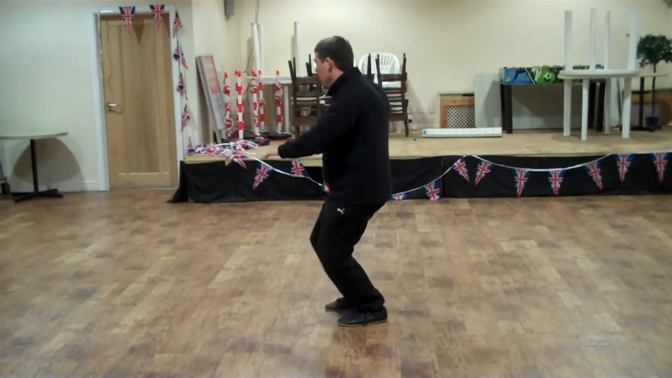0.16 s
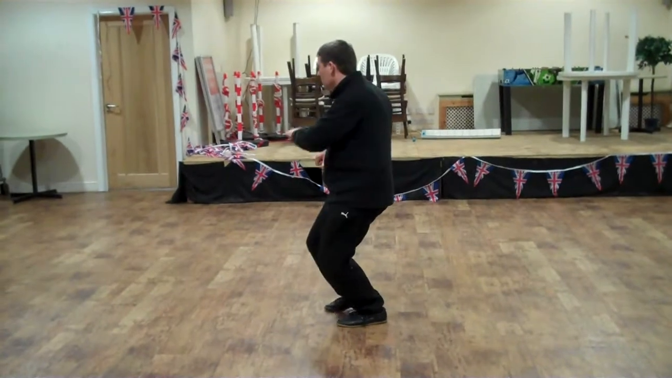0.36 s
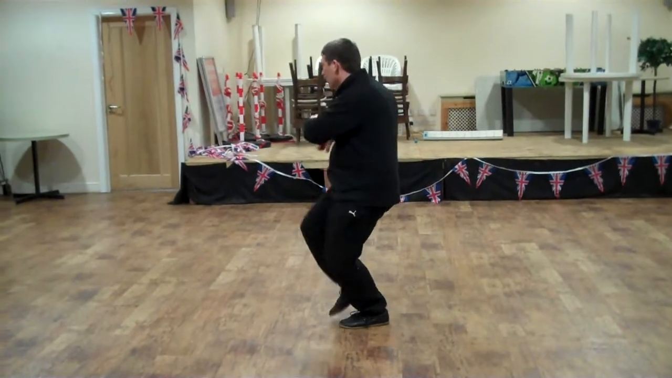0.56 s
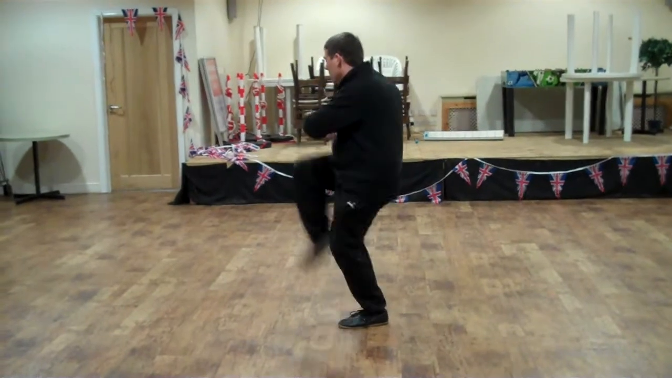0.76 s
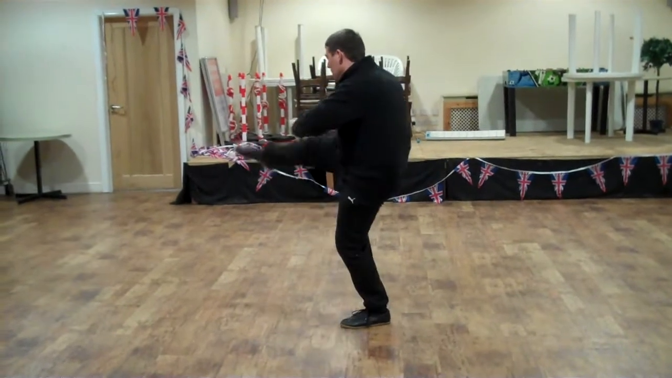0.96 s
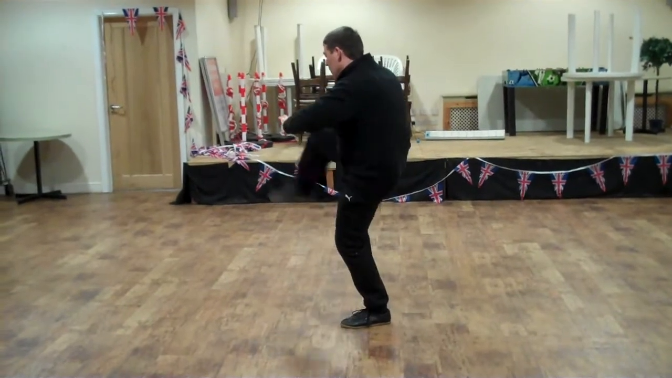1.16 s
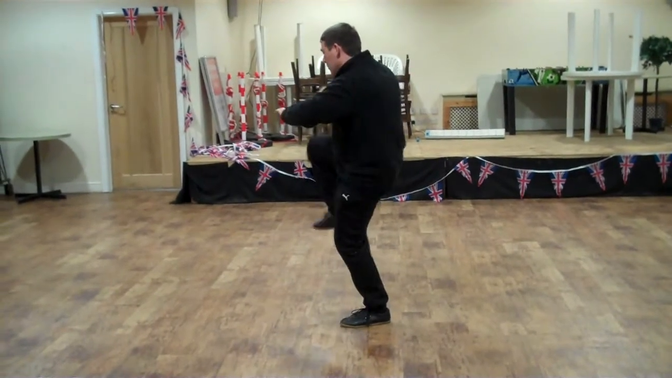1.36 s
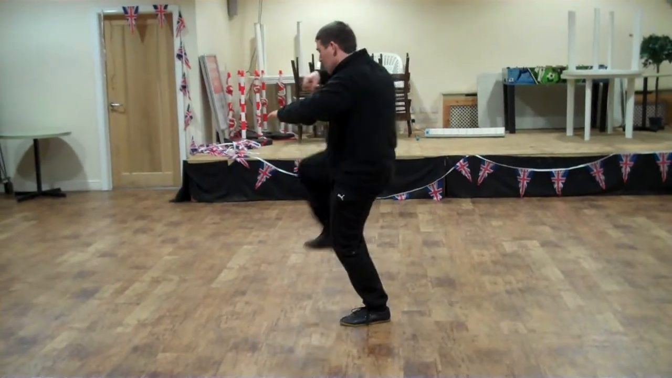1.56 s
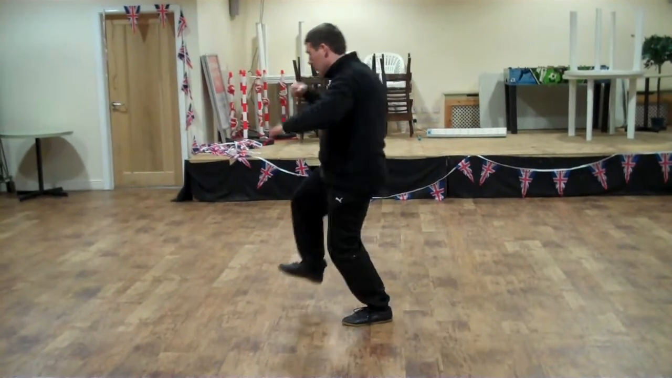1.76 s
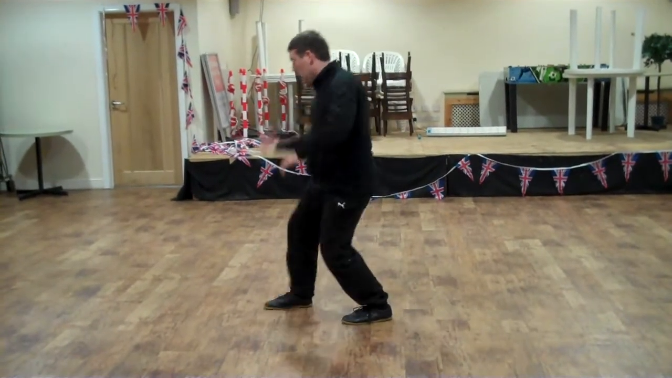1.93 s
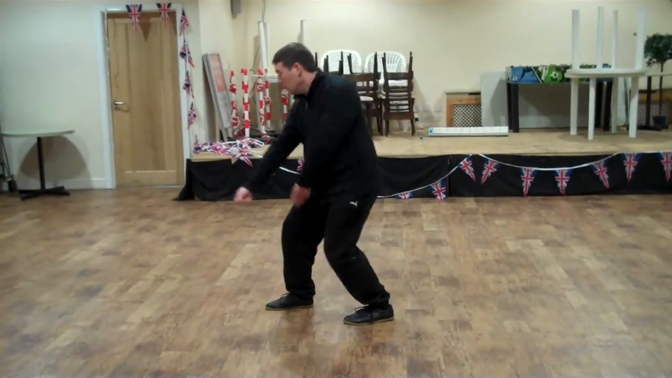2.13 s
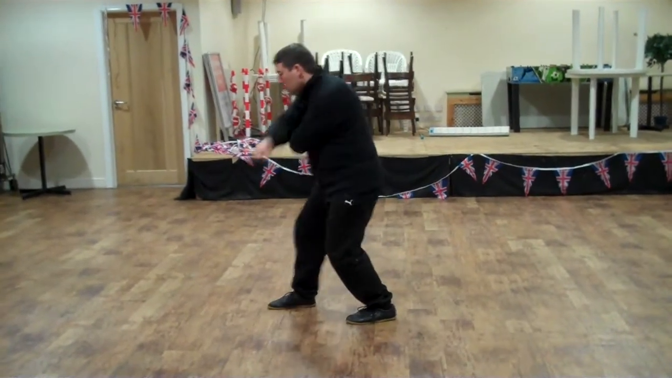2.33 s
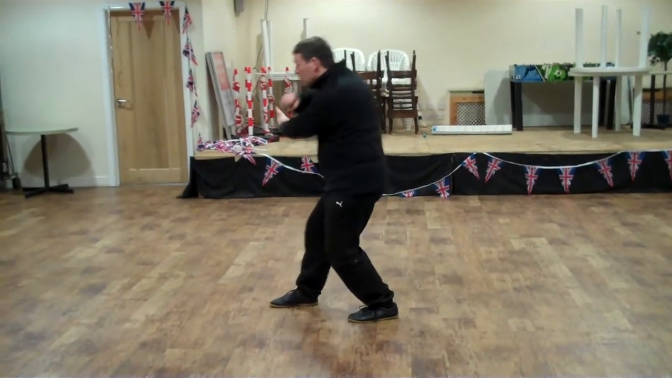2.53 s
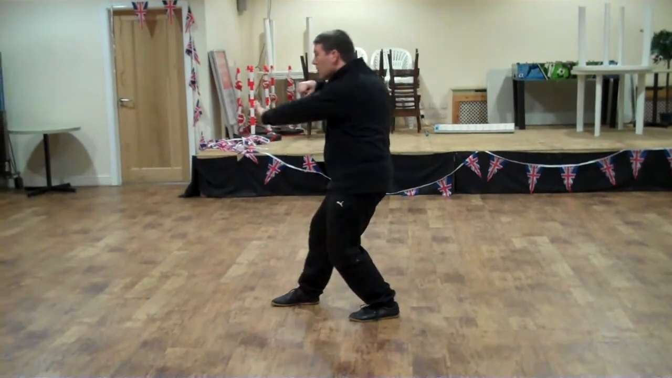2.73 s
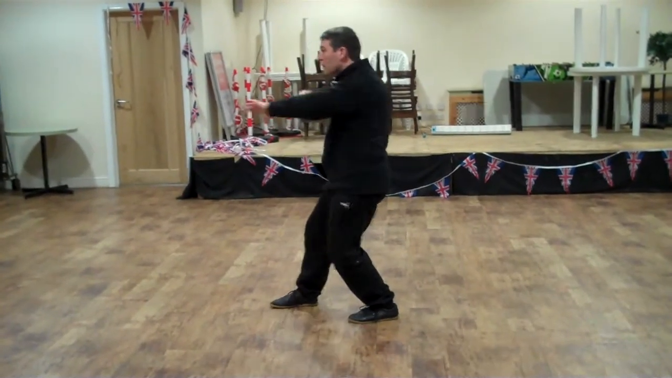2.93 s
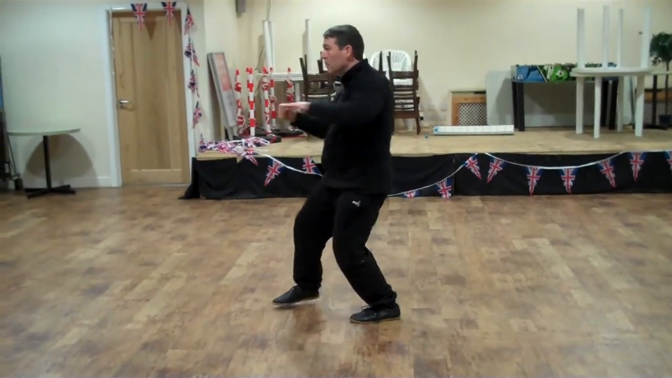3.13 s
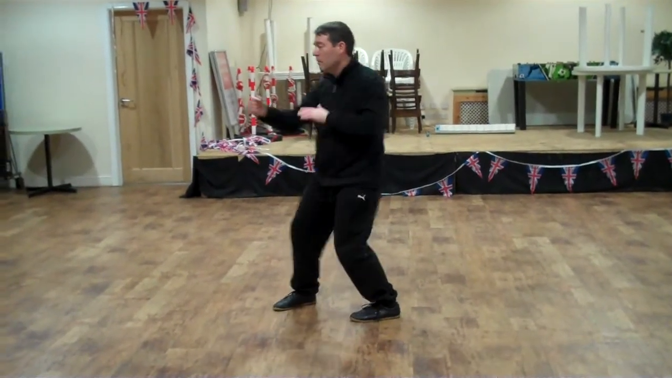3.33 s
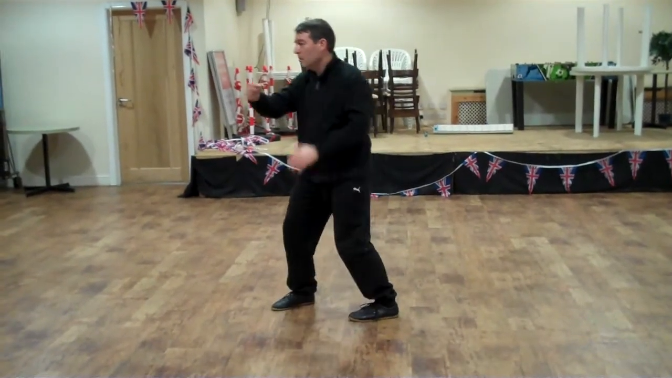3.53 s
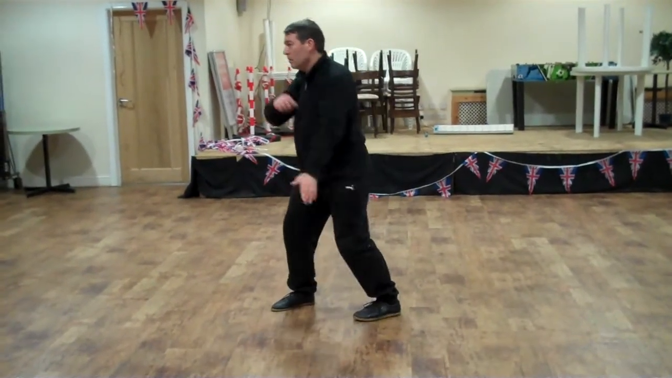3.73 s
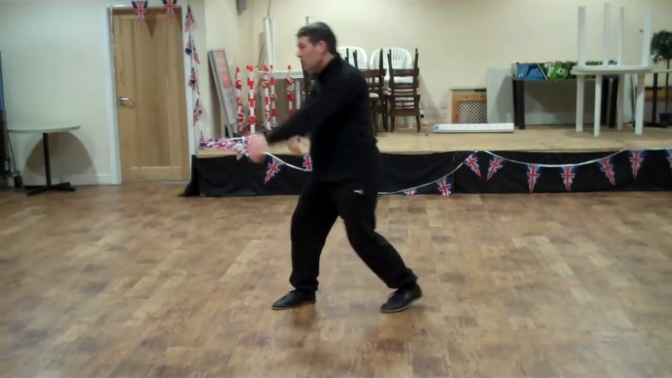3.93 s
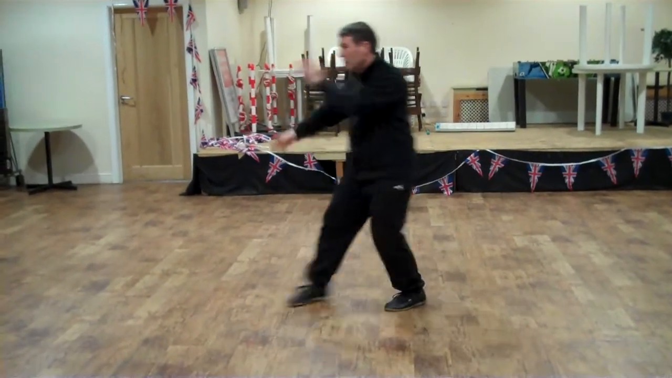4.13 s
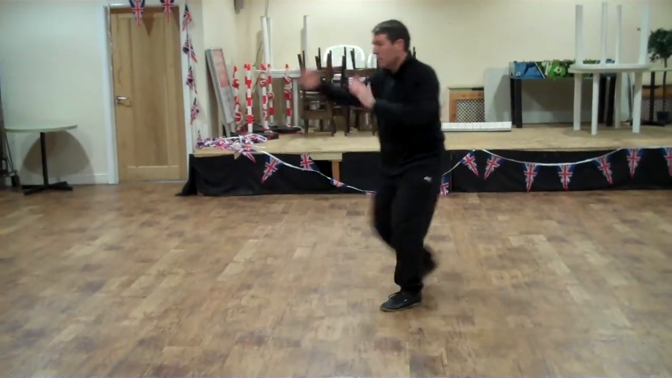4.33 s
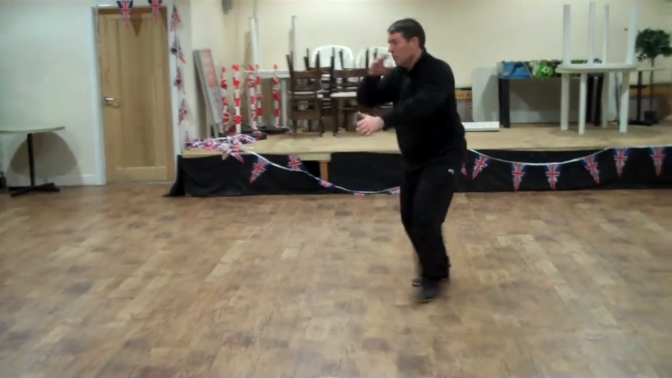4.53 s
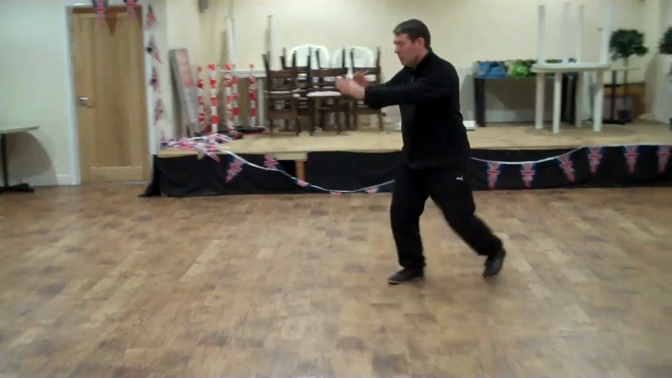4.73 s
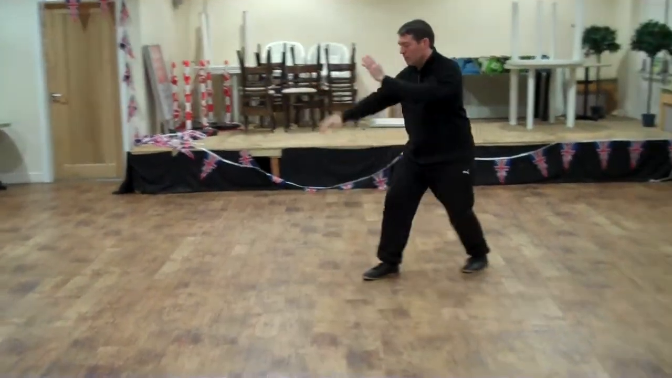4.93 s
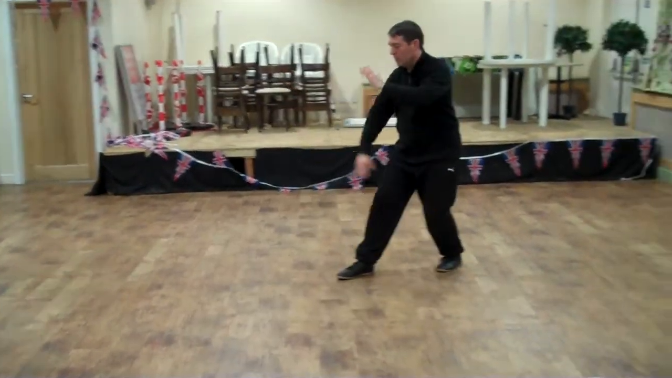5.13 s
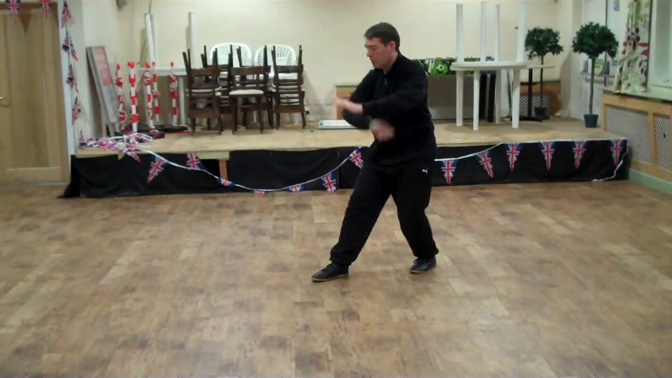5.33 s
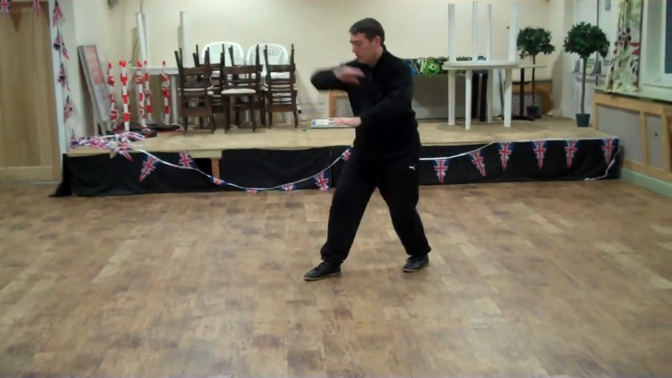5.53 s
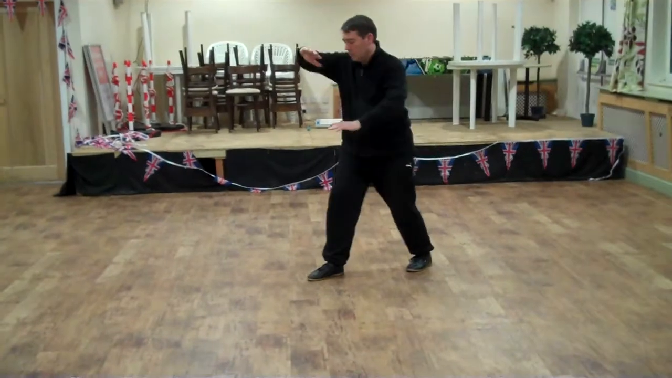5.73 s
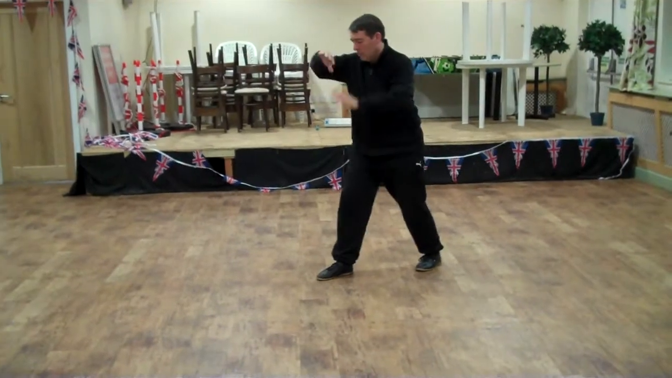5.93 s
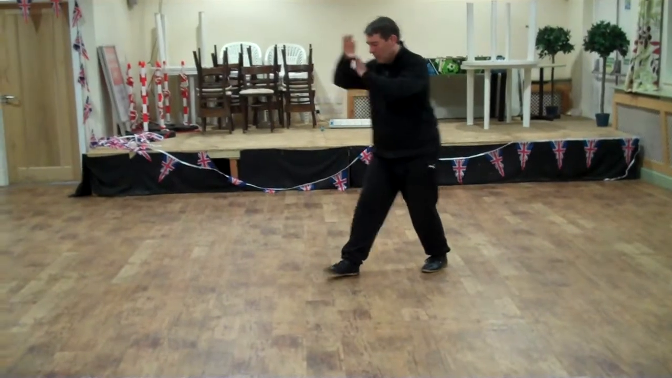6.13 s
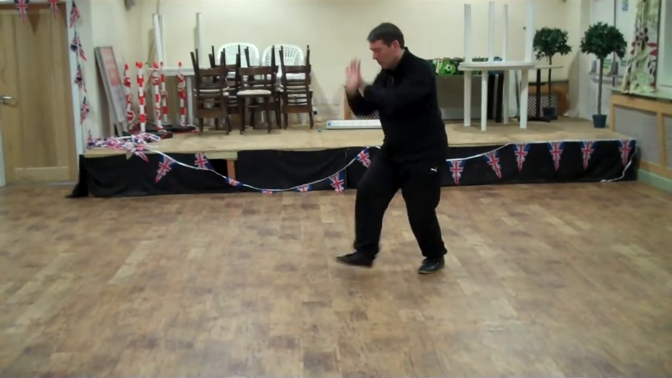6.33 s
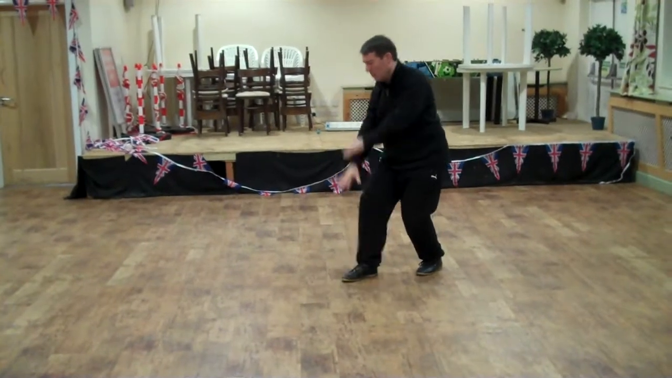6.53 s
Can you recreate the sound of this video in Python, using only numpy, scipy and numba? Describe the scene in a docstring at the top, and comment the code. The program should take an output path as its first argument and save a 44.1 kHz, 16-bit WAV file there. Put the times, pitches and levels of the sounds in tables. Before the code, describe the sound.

Quiet ventilation and faint hum fill a large, empty wooden-floored hall. Two tiny shoe taps precede a loud, sharp stamp that rings away in the reverberation. A crisp hand slap on the arm follows, then clothing swishes, a dull footfall and two hollow shoe slides. After a calm stretch, a flat sole smacks the floor. Stereo microphones hear it from some distance.

```python
"""A man practises martial-arts moves on the wooden floor of a large empty hall, over quiet air noise and hum tones.
Filtered noise swishes as his clothes swing, and shoes touch lightly; a stamp follows, then a slap on the arm.
Weight rumbles through the floor, a thud lands, his shoes slide twice as gliding resonances, and a faint whine sets in.
Last, a foot slaps down flat. Blows are click-and-noise runs that ring a struck body, with two near echoes;
blows, touches, cloth and slides ring on in the hall, a dying stereo noise."""
import sys
import numpy as np
from scipy import signal
from scipy.fft import rfft, irfft, next_fast_len
from scipy.io import wavfile
from numba import njit

SR = 44100
rng = np.random.default_rng(int(sys.argv[2]) if len(sys.argv) > 2 else 0)


def generate_wav(sig):
    """Save sig (samples, or channels by samples) to the path in sys.argv[1] as 16-bit PCM at SR."""
    pcm = np.round(np.clip(np.atleast_2d(sig).T, -1, 1) * 32767).astype(np.int16)
    wavfile.write(sys.argv[1], SR, pcm)


N = 290178
TIME = np.arange(N) / SR  # s

# colour of a slap on the arm, shared by the light shoe touches: (frequency [Hz], level [dB])
SLAP_COLOUR = [(100, -36), (190, -23), (345, -9.5), (500, -13), (740, -3), (1250, -6), (1600, -12.5),
               (2000, -0.5), (3360, -9.5), (4050, -6), (5500, -11), (7370, -4), (9850, -27), (14000, -46)]


def from_db(db):
    """Turns decibels into an amplitude factor."""
    return 10 ** (np.asarray(db) / 20)


def rms_one(x):
    """Scales a sound to an RMS of 1."""
    return x / np.sqrt(np.mean(x ** 2) + 1e-20)


def at_hz(points, hz):
    """Reads a table on a log-frequency axis."""
    known_hz, values = np.transpose(points)
    return np.interp(np.log(np.maximum(hz, 1)), np.log(known_hz), values)


def convolve(x, response):
    """Filters each channel with an impulse response and trims it to the scene."""
    return signal.fftconvolve(np.atleast_2d(x), np.atleast_2d(response), axes=-1)[:, :N]


def causal_response(points, size=4096):
    """Minimum-phase impulse response with the given spectrum: its energy comes as early as possible."""
    level_db = at_hz(points, np.fft.rfftfreq(size, 1 / SR))
    cepstrum = irfft(np.log(from_db(level_db)))
    # folding the cepstrum onto positive times makes the phase minimal
    cepstrum[1:size // 2] *= 2
    cepstrum[size // 2 + 1:] = 0
    return irfft(np.exp(rfft(cepstrum)))


def dull(x, hz):
    """A soft contact loses its treble."""
    low_pass = signal.butter(2, min(hz, .45 * SR), fs=SR, output="sos")
    return signal.sosfilt(low_pass, x + 1e-18)


def thin(x, hz):
    """A light contact lacks bass."""
    high_pass = signal.butter(1, min(hz, .45 * SR), "high", fs=SR, output="sos")
    return signal.sosfilt(high_pass, x)


def resonate(x, hz, width_hz):
    """One resonance with a gain of about 1 on top."""
    r = np.exp(-np.pi * width_hz / SR)
    zeros = np.array([1, 0, -1]) * (1 - r * r) / 2
    poles = [1, -2 * r * np.cos(2 * np.pi * hz / SR), r * r]
    return signal.lfilter(zeros, poles, x + 1e-18)


@njit
def glide(x, hz, width_hz):
    """A resonance of steady width whose centre moves."""
    y = np.zeros(len(x))
    r = np.exp(-np.pi * width_hz / SR)
    for i in range(2, len(x)):
        driven = (1 - r * r) / 2 * (x[i] - x[i - 2])
        y[i] = driven + 2 * r * np.cos(2 * np.pi * hz[i] / SR) * y[i - 1] - r * r * y[i - 2]
    return y


def stroke(s, hold_s, level_db, rise_s, fall_s):
    """A movement speeds up, keeps its pace and slows down again, with Gaussian flanks."""
    before = np.maximum(s - TIME, 0) / rise_s
    after = np.maximum(TIME - s - hold_s, 0) / fall_s
    return from_db(level_db) * np.exp(-.5 * (before + after) ** 2)


def friction(slips_per_s, spread_db):
    """Dense tiny slips of uneven size."""
    slips = rng.random(N) < slips_per_s / SR
    unevenness = from_db(spread_db * rng.standard_normal(N))
    return rms_one(slips * rng.standard_normal(N) * unevenness)


def diffuse_spectrum(size):
    """Noise arriving from all sides: alike in both microphones in the bass, nearly unrelated in the treble."""
    # left-right likeness of diffuse sound: (frequency [Hz], correlation [-1 to 1])
    likeness = [(30, .55), (80, .95), (300, .96), (600, .93), (1000, .88), (1500, .55), (2500, .1),
                (5000, -.08), (13000, 0)]
    hz = np.fft.rfftfreq(size, 1 / SR)
    alike = np.clip(at_hz(likeness, hz), -.99, .995)
    mid, side = rfft(rng.standard_normal((2, size)))
    spread = np.sqrt((1 - alike) / (1 + alike)) * side
    return hz, mid + spread * [[1], [-1]]


def wavering_tone(hz, level_db, width_hz):
    """A sine whose phase wanders, smoothed by a resonance."""
    wander = np.cumsum(rng.standard_normal(N)) * np.sqrt(2 * np.pi * width_hz / SR)
    tone = np.sin(2 * np.pi * hz * TIME + wander)
    return from_db(level_db) * np.sqrt(2) * resonate(tone, hz, 20 + 4 * width_hz)


def ventilation(air_db=-52, whine_from_s=4.94, whine_fade_s=.3):
    """Steady moving air is coloured diffuse noise, with mains hum, wavering fan tones and a late whine."""
    # colour of the moving air: (frequency [Hz], level [dB])
    air_colour = [(25, -18), (50, -9), (70, -12), (130, -9.5), (180, -6.5), (240, -1), (330, -1), (470, 0),
                  (850, -1.5), (1250, -7.5), (2500, -16), (5800, -21.5), (7200, -16.5), (9000, -23.5),
                  (14000, -27.5)]
    # mains hum and fan tones: (frequency [Hz], level [dB], width [Hz])
    hum_tones = [(99, -64, 0.29), (136.5, -66, 7.9), (456.3, -64.5, 18.8), (664, -60, 14.14),
                 (775, -66.5, 15.6), (2630, -75.5, 39)]
    hz, noise = diffuse_spectrum(next_fast_len(N, True))
    air = irfft(noise * from_db(at_hz(air_colour, hz)))[:, :N]
    hum = sum(wavering_tone(*tone) for tone in hum_tones)
    fade_in = np.clip((TIME - whine_from_s) / whine_fade_s, 0, 1)
    whine = wavering_tone(hz=2500, level_db=-69, width_hz=44) * fade_in
    return from_db(air_db) * air / air.mean(axis=0).std() + hum + whine


def cloth(catch_db=2.2, catches_per_s=60, rise_share=0.51, fall_share=0.48):
    """Fibres rub as limbs swing, and folds catch and let go; light cloth is thinner and swells more abruptly."""
    # one swish per swing: (middle [s], length [s], level [dB], heft [0 a sleeve, 1 a trouser leg])
    swishes = [(.48, 0.13, -60, 0.69), (.79, 0.27, -55, 0.69), (1.5, 0.72, -66, 0.58), (2.97, .2, -66, .2),
               (3.715, 0.12, -47, 0.62), (3.8, 0.029, -46, .05), (3.903, 0.11, -42.5, 0.037),
               (4.147, 0.058, -31, 1), (4.38, 0.12, -38.5, 0.55), (4.635, 0.054, -50.5, .05),
               (4.751, 0.12, -44, 0.21), (6.07, 0.29, -63.5, 0.26)]
    # colour of rubbing fibres: (frequency [Hz], level [dB])
    cloth_colour = [(300, -22), (640, -7.5), (1250, -12.5), (2200, -9), (3000, -11), (5400, -11),
                    (6500, -5.5), (7500, 1.5), (8600, -7), (10500, -16), (14000, -23.5)]
    fibres = convolve(friction(slips_per_s=12000, spread_db=0.0), causal_response(cloth_colour))[0]
    folds = np.interp(TIME * catches_per_s, np.arange(N), rng.standard_normal(N))
    fibres = fibres * from_db(catch_db * folds)
    out = 0
    for s, length_s, level_db, heft in swishes:
        # from sleeve to trouser leg, the bass cut falls and the swell takes more of the length
        thin_hz = np.exp(np.interp(heft, [0, 1], np.log((6000, 700))))
        swell_s = length_s * np.interp(heft, [0, 1], (0.25, 1))
        hold_s = length_s - swell_s
        swing = stroke(s - hold_s / 2, hold_s, level_db, rise_share * swell_s, fall_share * swell_s)
        out = out + rms_one(thin(fibres, thin_hz)) * swing
    return out


def touches(fade_s=0.0038):
    """Light touches of a shoe on the boards are short, fading bursts of dulled noise."""
    # shoe touches: (time [s], level [dB], treble cut [Hz])
    light_contacts = [(1.213, -30.5, 2980), (1.277, -31.5, 6000), (3.631, -32, 1500), (4.612, -39, 12000)]
    out = 0
    for s, level_db, dull_hz in light_contacts:
        fade = np.exp(-np.abs(TIME - s) / fade_s) * (TIME >= s)
        grit = dull(rng.standard_normal(N) * fade, dull_hz)
        out = out + from_db(level_db) * grit / np.linalg.norm(grit)
    body = causal_response(SLAP_COLOUR)
    return convolve(out, body / np.linalg.norm(body))[0]


def disperse(x):
    """Two all-passes spread a crack over a few cycles."""
    for centre_hz, width_hz in ((6000, 2600), (2500, 2500)):
        r = np.exp(-np.pi * width_hz / SR)
        poles = [1, -2 * r * np.cos(2 * np.pi * centre_hz / SR), r * r]
        x = signal.lfilter(poles[::-1], poles, x)
    return x


def blow(cracks, colour, modes, crush_db, crush_s, hall_db, size=4096):
    """Each crack is a sharp pulse and a short noisy crush that set the struck body ringing.
    Returns the direct sound and the feed of the hall, where the run merges into a single bang."""
    t = TIME[:size]
    force = np.zeros((2, N + size))
    for s, level_db, thin_hz, dull_hz in cracks:
        crush = rng.standard_normal(size) * np.exp(-t / crush_s)
        pulse = signal.unit_impulse(size) + from_db(crush_db) * crush / np.linalg.norm(crush)
        start = round(s * SR)
        force[0, start:start + size] += from_db(level_db) * thin(dull(pulse, dull_hz), thin_hz)
    times, levels_db = np.transpose(cracks)[:2]
    energy = from_db(levels_db) ** 2
    bang_s = np.average(times, weights=energy)
    force[1, round(bang_s * SR)] = from_db(hall_db) * np.sqrt(energy.sum())
    snap = causal_response(colour)
    ringing = sum(from_db(db) * resonate(snap, hz, width) for hz, width, db in modes)
    body = snap + ringing
    return convolve(force, disperse(body) / np.linalg.norm(body))


def stamp():
    """A stamping foot lands in a quick run of contacts and rings shoe and boards."""
    # contacts: (time [s], level [dB], bass cut [Hz], treble cut [Hz])
    cracks = [(1.8954, -0.5, 700, 13000), (1.9016, 8.5, 1100, 3850), (1.9082, 4.5, 70, 13000)]
    # colour of the blow: (frequency [Hz], level [dB])
    colour = [(40, -33), (97, -19.5), (166, -17.5), (250, -13), (335, -2.5), (442, -11), (638, 0.5),
              (820, -0.5), (1400, -10), (1880, -7.5), (4420, -10.5), (7400, -7), (10000, -26), (14000, -45)]
    # resonances: (frequency [Hz], width [Hz], level over the crack [dB])
    modes = [(367, 26, -17), (636, 58, -5), (740, 46, -29), (905, 130, -16), (1580, 210, -0.5),
             (2670, 45, 0)]
    return blow(cracks, colour, modes, crush_db=-0.5, crush_s=0.0023, hall_db=0.5)


def thuds():
    """The boards give under a landing foot and swing back a few times, as decaying sines."""
    # landings: (time [s], level [dB], frequency [Hz], width [Hz])
    landings = [(1.907, -42, 88, 20), (4.274, -34, 383, 110), (6.479, -41, 105, 30)]
    out = 0
    for s, level_db, hz, width_hz in landings:
        age = np.maximum(TIME - s, 0)
        swing = np.sin(2 * np.pi * hz * age) * np.exp(-np.pi * width_hz * age)
        out = out + from_db(level_db) * thin(thin(swing, hz / 2), hz / 2)
    return out


def arm_slap():
    """A cupped hand meets the arm in two close contacts and rings."""
    # contacts: (time [s], level [dB], bass cut [Hz], treble cut [Hz])
    cracks = [(3.2582, -0.61, 403, 14000), (3.2614, -1.55, 100, 6100)]
    # resonances: (frequency [Hz], width [Hz], level over the crack [dB])
    modes = [(690, 74, -3.5), (920, 140, -11), (1420, 50, 7.5), (2230, 40, -23)]
    return blow(cracks, SLAP_COLOUR, modes, crush_db=0.5, crush_s=0.00087, hall_db=-0.64)


def rumble(hz=55, width_hz=30):
    """The sprung floor flexes as he steps across and shifts his weight: noise through a low resonance."""
    flex = resonate(resonate(rng.standard_normal(N), hz, width_hz), hz, width_hz)
    return rms_one(flex) * stroke(s=4.2, hold_s=0.16, level_db=-70.5, rise_s=.12, fall_s=0.39)


def scuffs(grit_db=-17):
    """A sliding sole rubs through one hollow resonance with a little grit; it bites hard, then drags lightly."""
    # slides: (time [s], length [s], level [dB], starting resonance [Hz], width [Hz])
    slides = [(4.315, 0.395, -36, 864, 616), (4.706, 0.25, -37, 1350, 516)]
    attack_s, bite_s, drag_share, release_s = 0.014, 0.077, 0.14, .025
    settled_hz, settle_s = 903, 0.01
    rub = friction(slips_per_s=6000, spread_db=3.5)
    out = 0
    for s, length_s, level_db, start_hz, width_hz in slides:
        age = np.maximum(TIME - s, 0)
        bite = np.exp(-(age / bite_s) ** 2)
        hz = settled_hz + (start_hz - settled_hz) * np.exp(-age / settle_s)
        rough = glide(rub, hz, width_hz)
        hollow = glide(rough, hz, width_hz)
        slide = stroke(s, length_s, level_db, attack_s, release_s)
        pressure = (drag_share + (1 - drag_share) * bite) * slide
        out = out + rms_one(hollow + from_db(grit_db) * rough) * pressure
    return out


def sole_slap():
    """A flat sole slaps the floor in three close contacts and rings shoe and boards."""
    # contacts: (time [s], level [dB], bass cut [Hz], treble cut [Hz])
    cracks = [(6.4744, 5, 1200, 15000), (6.4764, 2.5, 700, 6000), (6.4781, 5, 60, 4240)]
    # colour of the blow: (frequency [Hz], level [dB])
    colour = [(50, -29), (170, -21.5), (250, -6.5), (315, -12), (390, -3), (480, -7.5), (610, -6.5),
              (1000, -8.5), (1640, -2), (2950, -4), (5450, -15), (7600, -3), (10000, -24), (14000, -36)]
    # resonances: (frequency [Hz], width [Hz], level over the crack [dB])
    modes = [(265, 40, -8), (620, 71, 4.5), (1650, 18, 5), (2080, 40, -11)]
    return blow(cracks, colour, modes, crush_db=-4.5, crush_s=0.003, hall_db=-0.5)


def early_echoes(x):
    """A blow comes back from the two nearest surfaces, delayed and weaker."""
    # one delay [s] per echo
    delays_s = (.00445, .0111)
    # one level [dB] per echo
    levels_db = (-9, -11)
    echoes = sum(from_db(db) * np.pad(x, (round(s * SR), 0))[:N] for s, db in zip(delays_s, levels_db))
    return x + echoes


def straight_path(x, left_db=2.0, split_hz=1300):
    """Direct sound: its treble is louder on the left, and it reaches the right a sample sooner."""
    bass = signal.sosfilt(signal.butter(1, split_hz, fs=SR, output="sos"), x + 1e-18)
    treble = x - bass
    left, right = bass + treble * from_db([[left_db / 2], [-left_db / 2]])
    return np.array([np.r_[0, left[:-1]], right])


def hall_response(size=98304):
    """Dense echoes build up, then die away, the high treble soonest; the mid signal has unit energy."""
    # ring time: (frequency [Hz], time to fall by 60 dB [s])
    ring_times = [(60, 1.0), (150, 1.5), (330, 1.47), (650, 1.69), (1100, 1.71), (2200, 1.51), (4000, 1.25),
                  (5600, 0.87), (7700, 0.74), (13000, 0.62)]
    # tone of the hall: (frequency [Hz], level [dB])
    hall_tone = [(60, 5), (300, 4.5), (700, 2), (1500, -1), (3000, -4), (5500, -3.5), (7500, -6),
                 (11000, -4.5)]
    # build-up of the echoes: (time [s], level [dB])
    build_up = [(.004, 0), (.011, 1.5), (.028, 0), (.053, -0.5), (.083, 1.5), (.113, 1.5)]
    hz, noise = diffuse_spectrum(size)
    noise = noise * from_db(at_hz(hall_tone, hz))
    t, out = TIME[:size], 0
    centres, t60s = np.transpose(ring_times)
    # overlapping bands each decay at their own rate
    for share, t60 in zip(np.eye(len(centres)), t60s):
        band = irfft(noise * at_hz(np.c_[centres, share], hz))
        out = out + band * np.exp(-np.log(1000) * t / t60)
    out = out * from_db(np.interp(t, *np.transpose(build_up))) * (t > build_up[0][0])
    return out / np.linalg.norm(out.mean(axis=0))


def scene():
    """Mixes direct sounds and the hall; thuds and rumble stay direct, and ventilation lies beneath."""
    air = ventilation()
    swish, taps, slide = cloth(), touches(), scuffs()
    cracks, bangs = stamp() + arm_slap() + sole_slap()
    direct = early_echoes(cracks) + taps + from_db(-3.0) * swish + from_db(-3.5) * slide + thuds() + rumble()
    feed = bangs + taps + from_db(-2.5) * swish + from_db(-6.0) * slide
    return straight_path(direct) + convolve(feed, hall_response()) + air


def record(dry):
    """The left microphone is the brighter one; the highest peaks overload softly and the top is cut steeply."""
    # balance of the microphone pair: (frequency [Hz], left minus right [dB])
    balance = [(100, 3), (280, 2), (600, 1), (1000, -0.5), (1600, 4.5), (3000, 4.5), (5000, 2.5), (7400, 7),
               (10000, 3), (13000, 3)]
    hz, lean_db = np.transpose(balance)
    microphones = [causal_response(np.c_[hz, side * lean_db / 2]) for side in (1, -1)]
    picked_up = convolve(dry, microphones)
    rounded = picked_up / (1 + (picked_up / .9) ** 6) ** (1 / 6)
    low_pass = signal.ellip(10, .1, 80, 14300, fs=SR, output="sos")  # cutoff in Hz
    return signal.sosfilt(low_pass, rounded)


dry = scene()
out = record(dry)
generate_wav(out)
```